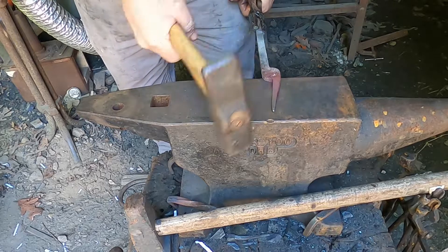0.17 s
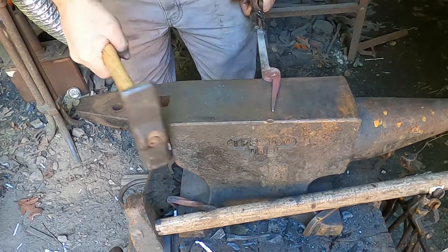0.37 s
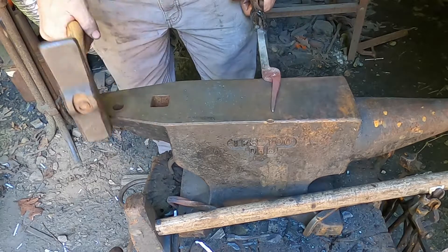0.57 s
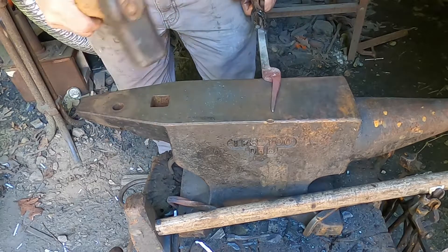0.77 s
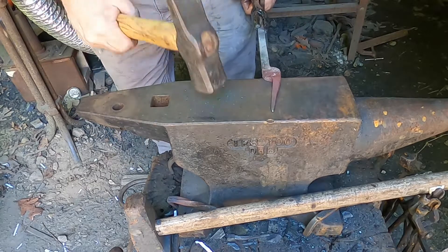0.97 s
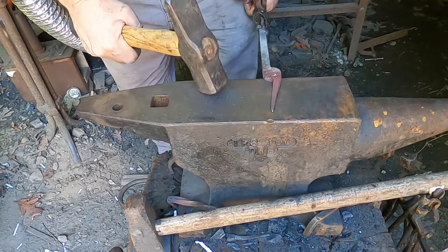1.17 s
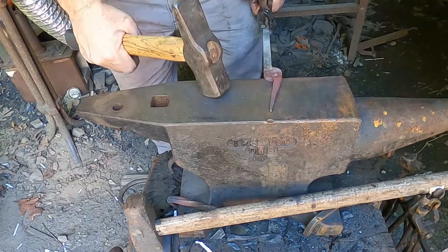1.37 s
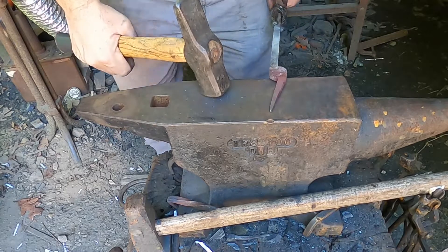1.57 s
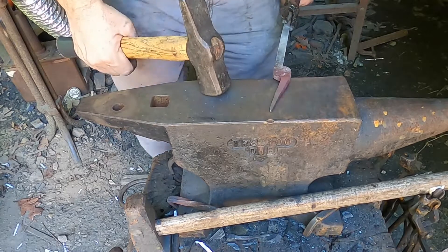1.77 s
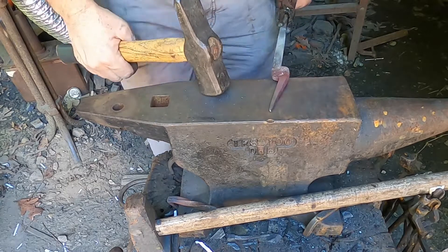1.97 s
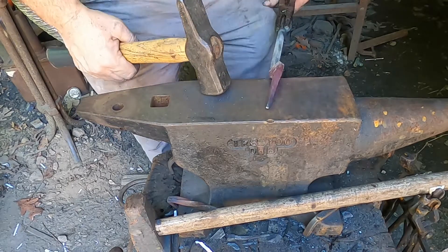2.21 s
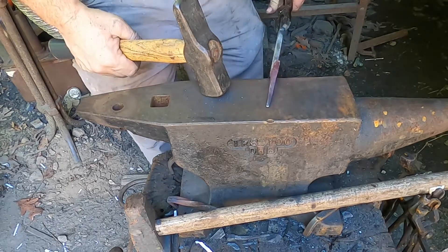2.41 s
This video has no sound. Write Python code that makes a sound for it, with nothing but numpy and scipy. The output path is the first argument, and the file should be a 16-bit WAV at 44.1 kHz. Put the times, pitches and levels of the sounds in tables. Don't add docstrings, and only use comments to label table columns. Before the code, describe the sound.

Close stereo sound of a smith's anvil: one thudding, ringing blow, a brief metallic rattle, then a dropped hammer's sharp clinks speeding up until still, followed by faint gravel scuffs and cloth rustle outdoors.

```python
import sys
import numpy as np
from scipy import signal
from scipy.fft import rfft, irfft, next_fast_len
from scipy.io import wavfile

SR = 44100
rng = np.random.default_rng(int(sys.argv[2]) if len(sys.argv) > 2 else 0)


def dump_mix(stems):
    frames = np.atleast_2d(stems).T
    limited = np.clip(frames, -1, 1)
    pcm = np.round(limited * 32767).astype(np.int16)
    wavfile.write(sys.argv[1], SR, pcm)


def invert_db(level):
    return 10 ** (np.asarray(level, dtype=float) / 20)


N = 108045
PAD = 23000


def at_hz(points, hz):
    table_hz, values = np.transpose(points)
    return np.interp(np.log(hz), np.log(table_hz), values)


def clicks(rows, gains):
    out = np.zeros(N + PAD)
    np.add.at(out, (np.array(rows)[:, 0] * SR).astype(int) + PAD, gains)
    return out + 1e-18


def dying(power, t60, rise_s):
    fall = invert_db(-120 / (t60 * SR))
    rise = np.exp(-1 / (rise_s * SR))
    decayed = signal.lfilter([1], [1, -fall], power)
    level = np.sqrt(signal.lfilter([1 - rise], [1, -rise], decayed))
    return np.convolve(level[PAD - 30:], np.hanning(31) / 15, "valid")


def drift(rate):
    knots = rng.standard_normal(int(N / SR * rate) + 3)
    return 1.2 * np.interp(np.arange(N) / SR * rate, np.arange(len(knots)), knots)


def resonator(hz, t_decay):
    return 2 * np.pi * hz / SR, t_decay


# (pitch [Hz], share [0-1])
LIKENESS = [(50, 0.98), (500, 0.97), (2000, 0.49), (8000, 0.2)]
EDGES = 25 * 2 ** np.arange(0, 9.4, .4)


def bands():
    white = rng.standard_normal((2, 2, N))
    for k, (low, high) in enumerate(zip(EDGES, EDGES[1:])):
        band = signal.butter(2, [low, high], "band", fs=SR, output="sos")
        mid, side = signal.sosfilt(band, white[k % 2])
        hz = np.sqrt(low * high)
        alike = np.clip(at_hz(LIKENESS, hz), 0, 1)
        yield hz, np.sqrt(1 + alike) * mid + np.sqrt(1 - alike) * side * [[1], [-1]]


# (time [s], level [dB])
WORK_BLOWS = [
    (-.5, 3.5),
    (0.236, 2.5),
]
# (time [s], level [dB], brightness [dB per octave])
RATTLES = [(0.344, -34.5, -12.5), (0.36, -7, -2.5), (0.367, -18, -10), (0.397, -28, -11.5),
           (0.411, -27, -12), (0.4384, -19, -6.5), (0.457, -32.5, -5.5), (0.482, -36, -12.5),
           (0.508, -35.5, 0.5), (0.529, -22.5, -11.5), (.575, -37.5, -12), (0.590, -35.5, -5),
           (0.599, -36.5, 0), (0.619, -39, -2), (0.6256, -36.5, -5.5), (0.644, -28.5, -8.5),
           (0.658, -27.5, -2), (0.691, -42, -2.5), (.708, -42.5, -3.5)]
# (time [s], level [dB])
BOUNCES = [(1.1776, 0), (1.2973, -1), (1.3683, -4), (1.4161, -6), (1.45, -5.5), (1.473, -11.5),
           (1.488, -17), (1.501, -25), (1.508, -27.5), (1.517, -41), (1.525, -29.5)]
DULLING = .4
RATTLE_DULL_DB = 17.5


def hits(work_db, face_db, rattle_db, hz, fade=1):
    octaves = np.log2(hz / 2000)
    above = max(octaves, 0)
    first_db = BOUNCES[0][1]
    rows = [(s, db + work_db) for s, db in WORK_BLOWS]
    for s, db in BOUNCES:
        softer_db = fade * (db - first_db) * (1 + DULLING * above)
        rows.append((s, softer_db + first_db + face_db))
    for s, db, tilt in RATTLES:
        colour_db = tilt * max(octaves, -1) - RATTLE_DULL_DB * max(octaves - 1, 0)
        rows.append((s, db + colour_db + face_db + rattle_db))
    return np.array(rows)


# (pitch [Hz], level [dB per Hz])
AIR = [(25, 6), (60, 4.5), (125, -4), (200, -31.5), (500, -29.5), (2000, -38), (6000, -45), (15000, -59.5)]
AIR_DB = -51.5
# (pitch [Hz], level [dB per Hz])
RUSTLE = [(150, 1), (500, -9), (1200, -5), (2500, -9.5), (5000, -18.5), (9000, -27.5), (15000, -68)]
RUSTLE_DULL_DB = 25.5
# (time [s], level [dB])
MOVING = [(0, -89), (.232, -77), (.25, -52.5), (.3, -38), (.45, -57), (.68, -61), (.76, -91.5),
          (1.1, -77.5), (1.6, -64), (1.95, -68), (2.1, -57), (2.45, -64)]
# (time [s], length [s], level [dB], brightness [dB per octave])
SCUFFS = [(0.952, 0.018, -105.5, 17.5), (2.008, 0.036, -43.5, -2.4), (2.024, 0.023, -43, -2),
          (2.154, 0.014, -95.5, 16), (2.218, 0.026, -74.5, 9.5), (2.262, 0.088, -56, -0.7),
          (2.337, 0.027, -46.5, -2.5), (2.386, 0.031, -66.5, 9.5)]


def yard():
    t, air, out = np.arange(N) / SR, 0, 0
    moving, grit = invert_db(np.interp(t, *np.transpose(MOVING))), drift(60)
    shapes = []
    for s, length_s, _, _ in SCUFFS:
        start = np.clip((t - s) / 0.0025, 0, 1)
        shapes.append(start * np.exp(-np.clip(t - s, 0, None) / length_s))
    for hz, noise in bands():
        air = air + invert_db(at_hz(AIR, hz) + 0.5 * drift(1.4)) * noise
        scuff = 0
        for shape, (_, _, db, tilt) in zip(shapes, SCUFFS):
            scuff = scuff + invert_db(db + tilt * np.log2(hz / 1000)) * shape
        cloth = moving * invert_db(-RUSTLE_DULL_DB * max(np.log2(hz / 6000), 0))
        flicker = invert_db(at_hz(RUSTLE, hz) + 10.0 + 1.4 * grit + 0.51 * drift(25))
        out = out + flicker * np.hypot(cloth, scuff) * noise
    return invert_db(AIR_DB) * air / np.sqrt(np.mean(air ** 2)) + out


RATTLE_CRACK_DB = -6.5
# (pitch [Hz], level [dB per Hz])
ECHO = [(100, -0.5), (300, 6), (700, -7.5), (1200, -1), (2500, -0.5), (5500, -20), (7500, -34),
        (14000, -64.5)]
# (pitch [Hz], t60 [s])
ECHO_T60 = [(150, 0.09), (1000, 0.11), (4000, 0.15), (12000, 0.023)]
ECHO_WORK_DB, ECHO_FACE_DB = -15.5, -22
CONTACT_HZ = 6940


def shed():
    out = 0
    for hz, noise in bands():
        rows = hits(ECHO_WORK_DB, ECHO_FACE_DB, RATTLE_CRACK_DB, hz)
        level = dying(clicks(rows, invert_db(2 * rows[:, 1])), at_hz(ECHO_T60, hz), 0.00073)
        out = out + invert_db(at_hz(ECHO, hz) + 12.0) * level * noise
    return signal.sosfilt(signal.butter(12, CONTACT_HZ, fs=SR, output="sos"), out)


# (pitch [Hz], t60 [s], level on work [dB], level on face [dB])
STUMP = [(74, 0.18, -8.5, -27), (135, 0.19, -11, -27.5), (186, 0.056, 5, -20), (243, 0.056, 3.5, -3),
         (276, 0.056, -13, -22), (413.2, 0.12, -12, -13)]
RATTLE_THUD_DB, THUD_RISE_S = -8, 0.0036
THUD_SHARE, THUD_LAG = .8, 8
LOW_DELAY_HZ = 516
THUD_ECHO_S, THUD_ECHO_DB = .034, -10


def stump():
    out = 0
    for hz, t60, work_db, face_db in STUMP:
        rows = hits(work_db, face_db, RATTLE_THUD_DB, hz, THUD_SHARE)
        r, w = invert_db(-60 / (t60 * SR)), 2 * np.pi * hz / SR
        push = clicks(rows, invert_db(rows[:, 1]))
        out = out + signal.lfilter([0, np.sin(w)], [1, -2 * r * np.cos(w), r * r], push)
    q = np.exp(-1 / (THUD_RISE_S * SR))
    soft = signal.lfilter([1 - q], [1, -q], out)
    p = np.exp(-2 * np.pi * LOW_DELAY_HZ / SR)
    out = signal.sosfilt([[-p, 1, 0, 1, -p, 0]] * 4, soft)
    late = int(THUD_ECHO_S * SR)
    out[late:] += invert_db(THUD_ECHO_DB) * out[:-late]
    return np.array([out[PAD - THUD_LAG:-THUD_LAG], out[PAD:]])


# (time [s], level [dB], pitch [Hz])
KNOCKS = [(.344, -35, 880), (.396, -37, 805), (.409, -38.5, 900), (.439, -32, 861), (.457, -40, 864),
          (.466, -32.5, 900), (.482, -38, 890), (.708, -49, 960), (2.014, -40.5, 2600),
          (2.268, -44.5, 1200), (2.398, -57, 4000)]
KNOCK_T60_S = 0.029


def knocks():
    start, db, hz = np.array(KNOCKS).T[:, :, None]
    age = np.maximum(np.arange(N) / SR - start, 0)
    rings = invert_db(db - 60 * age / KNOCK_T60_S) * np.sin(2 * np.pi * hz * age)
    return rings.sum(axis=0)


SNAP_DB, RATTLE_SNAP_DB, SNAP_LOW_HZ, SNAP_HIGH_HZ = 15, -2, 900, 3300
SNAP_SHARE = .75


def snap():
    rows = hits(-99, SNAP_DB, RATTLE_SNAP_DB, 2000, SNAP_SHARE) + [.0004, 0]
    band = signal.butter(2, [SNAP_LOW_HZ, SNAP_HIGH_HZ], "band", fs=SR, output="sos")
    return -signal.sosfiltfilt(band, clicks(rows, invert_db(rows[:, 1])))[PAD:]


# (pitch [Hz], width [Hz], level on work [dB], level on face [dB])
CRACK = [(1170, 130, 9, -8), (2030, 200, 6.5, -13), (2630, 780, 2.5, -9.5), (4040, 1300, -21.5, -4),
         (6230, 910, -23.5, -24.5), (9100, 660, -22.5, -48.5), (13500, 3900, -26, -82)]
CLICK_SHARE = 1.15
SQUASH_S, SQUASH_DB = .0013, 0


def crack():
    out = 0
    for k, (hz, width_hz, work_db, face_db) in enumerate(CRACK):
        rows = hits(work_db, face_db, RATTLE_CRACK_DB, hz, CLICK_SHARE)
        if hz > 1500:
            rows = np.r_[rows, rows[:2] + [SQUASH_S, SQUASH_DB]]
        r, w = np.exp(-np.pi * width_hz / SR), 2 * np.pi * hz / SR
        push = clicks(rows, invert_db(rows[:, 1]))
        rung = signal.lfilter([np.sin(w), 0, -np.sin(w) * r], [1, -2 * r * np.cos(w), r * r], push)
        dull = signal.butter(4, min(1.256 * hz, 16000), fs=SR, output="sos")
        out = out + (-1) ** (k + 1) * signal.sosfilt(dull, rung)
    return out[PAD:]


# (time [s], level [dB], t60 [s])
FED = [(.359, -17.5, 0.05), (0.38, -53, 0.2), (.627, -53, 0.41), (.59, -28.5, 0.27), (.64, -22.5, 0.14),
       (.59, -52.5, 0.67), (0.61, -52.5, 0.39), (.45, -40.5, 0.11), (.58, -51, 0.35), (.705, -56, .2),
       (0.6, -60, 0.27), (0.36, -65.5, 0.33), (0.19, -53, .06), (0.33, -54, .08), (1.9, -57, 0.9)]
FED_HZ = [3461, 3461, 3461, 2322, 2322, 5568, 5568, 6383, 6383, 6383, 4156, 4156, 4770, 4770, 2076]
FED_RISE_S = .02


def fed(hz):
    t, out = np.arange(N) / SR, 0
    for (s, db, t60), mode_hz in zip(FED, FED_HZ):
        if mode_hz == hz:
            age = np.maximum(t - s, 0)
            level = invert_db(db - 60 * age / t60) * (1 - np.exp(-age / FED_RISE_S))
            out = np.hypot(out, level)
    return out


FREE_HZ = (1941.5, 2076, 2322, 2435, 5568, 6476, 8904, 14465)
ROUGH_HZ = (987, 4770)
ROUGH_PER_S = 90
REST_S, REST_DB_PER_S = 1.4246, 245
BLOOM_S, SNAP_S = 0.028, 0.00087
RATTLE_RING_DB, SCATTER_DB = -15.5, 1.8


def ring(pitches, modes):
    out, t = np.zeros((2, N)), np.arange(N) / SR
    rest = invert_db(-REST_DB_PER_S * np.maximum(t - REST_S, 0))
    for hz, (t60, work_db, work_pan, face_db, face_pan) in zip(pitches, modes):
        wave = np.sin(2 * np.pi * (hz * t + rng.random()))
        luck = rng.normal(0, SCATTER_DB, 40)
        luck[:3] = 0
        buzz = fed(hz)
        grain = drift(ROUGH_PER_S) if hz in ROUGH_HZ else 1
        rise_s = BLOOM_S if hz in FREE_HZ[:4] else SNAP_S
        damping = 1 if hz in FREE_HZ else rest
        for ear, side in enumerate((.5, -.5)):
            rows = hits(work_db + side * work_pan, face_db + side * face_pan, RATTLE_RING_DB, hz)
            energy = clicks(rows, invert_db(2 * (rows[:, 1] + luck[:len(rows)])))
            out[ear] += np.hypot(buzz, dying(energy, t60, rise_s)) * grain * wave * damping
    return out


FAINT_HZ = [2860, 2960, 6002, 6687, 7810, 8003, 8236, 9226, 11889, 12300, 13931, 14870]
# (t60 [s], level on work [dB], its left-right [dB], level on face [dB], its left-right [dB])
FAINT = [(0.16, -47, 3, -38, 1), (0.14, -53, -1.5, -35, 7), (0.28, -48.5, 0, -32.5, 4.5),
         (.2, -51, -6, -51.5, -3), (.15, -56, -0.5, -81, 1), (.3, -48, -11.5, -53.5, -4.5),
         (.25, -59.5, -4.5, -59, 1.5), (.2, -65.5, 1.5, -62.5, 6), (.25, -62.5, -8, -91, 1.5),
         (.4, -71, -5, -82.5, -6), (.4, -60.5, -9.5, -90.5, 0.5), (.5, -72, -7, -96.5, -2)]


def faint_ring():
    return ring(FAINT_HZ, FAINT)


HEAD_HZ = [6383, 6858, 7070, 8158, 8533, 8904, 9535, 10130, 10350, 10710, 12160, 12814, 13290, 14465]
# (t60 [s], level on work [dB], its left-right [dB], level on face [dB], its left-right [dB])
HEAD = [(0.2, -14.5, -9, -10.5, -2), (0.49, -50, 2, -52, -3), (0.089, -25.5, -2.5, -45.5, 16),
        (.3, -38.5, -6.5, -56.5, 2), (.15, -46, -4, -64.5, -4.5), (0.17, -58, -2.5, -49, -13.5),
        (0.27, -30.5, 0, -39.5, -1), (0.25, -44, -9, -72.5, -4.5), (0.1, -69.5, -3, -58.5, -0.5),
        (0.26, -42.5, 0.5, -71.5, -10), (.3, -57.5, -7, -66.5, -3.5), (.3, -55.5, -3, -94.5, -12),
        (.35, -52.5, 2, -85, -9), (.4, -53, -4, -62, 2.5)]


def hammer_head():
    return ring(HEAD_HZ, HEAD)


ANVIL_HZ = [987, 1941.5, 2076, 2322, 2435, 3461, 4003, 4156, 4422, 4770, 5005, 5568, 5823, 6476]
# (t60 [s], level on work [dB], its left-right [dB], level on face [dB], its left-right [dB])
ANVIL = [(0.26, -35, 4, -28.5, 1), (0.81, -20.5, -4, -25.5, -4), (1.29, -17, -15.5, -43, -12),
         (0.094, -13.5, 2, -14, 10.5), (0.45, -29, 4, -15, -3.5), (0.25, -46, -7, -28, -10.5),
         (0.25, -43, 4.5, -27, 4), (0.9, -48.5, -3.5, -45.5, 4.5), (0.18, -51.5, 4.5, -26, 6),
         (0.1, -41.5, -16.5, -22.5, -11.5), (0.34, -27.5, -7.5, -25.5, -9.5), (0.39, -40, 5.5, -28, -2),
         (0.13, -41, -11.5, -46.5, 5), (0.51, -40.5, 1, -52, -11.5)]


def anvil():
    return ring(ANVIL_HZ, ANVIL)


LEFT_LAG = 1.2


def scene():
    x = yard() + shed() + stump() + knocks() + snap() + crack()
    x = x + faint_ring() + hammer_head() + anvil()
    size = next_fast_len(N + 64)
    delay = np.exp(-2j * np.pi * LEFT_LAG * np.arange(size // 2 + 1) / size)
    x[0] = irfft(rfft(x[0], size) * delay, size)[:N]
    return x


def low_pass(x):
    return signal.sosfilt(signal.butter(12, 17160, fs=SR, output="sos"), x)


MIC_LOW_HZ = 48.8
KNEE_DB, SQUEEZE, RELEASE_DB_PER_S, GRAB_S = -10, 0.76, 83, 0.0015
FORE_S, FORE_DB, FORE_HZ = .0107, -20.5, 6450


def record(dry):
    t = np.arange(N) / SR
    dry = signal.sosfilt(signal.butter(3, MIC_LOW_HZ, "high", fs=SR, output="sos"), dry)
    over = np.maximum(20 * np.log10(np.abs(dry).max(axis=0) + 1e-9) - KNEE_DB, 0)
    release = RELEASE_DB_PER_S * t
    held = np.maximum.accumulate(over + release) - release
    q = np.exp(-1 / (GRAB_S * SR))
    x = dry * invert_db(-SQUEEZE * signal.lfilter([1 - q], [1, -q], held))
    lag = int(FORE_S * SR)
    dull = signal.sosfiltfilt(signal.butter(2, FORE_HZ, fs=SR, output="sos"), x)
    for k in (1, 2, 3):
        x[:, :-k * lag] += invert_db(k * FORE_DB) * dull[:, k * lag:]
    return low_pass(np.clip(x, -1, 1))


dry = scene()
out = record(dry)
dump_mix(out)
```